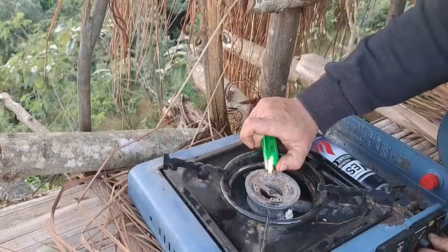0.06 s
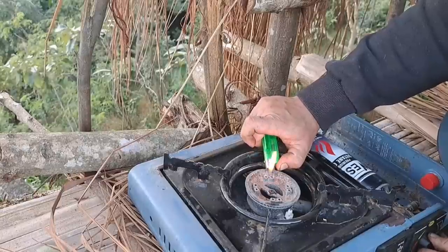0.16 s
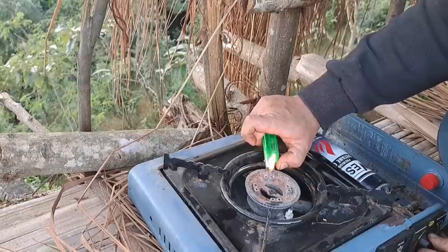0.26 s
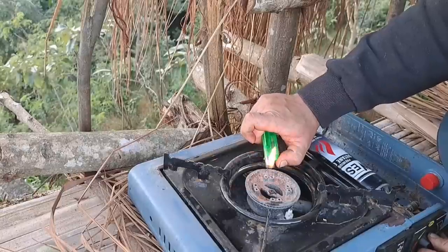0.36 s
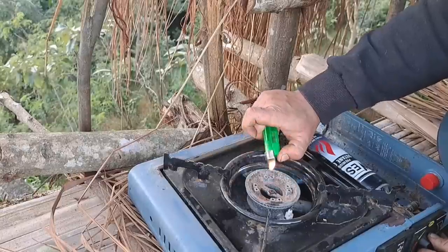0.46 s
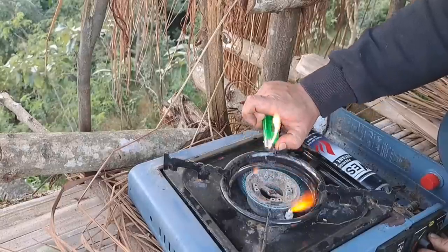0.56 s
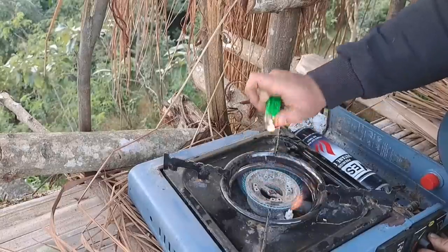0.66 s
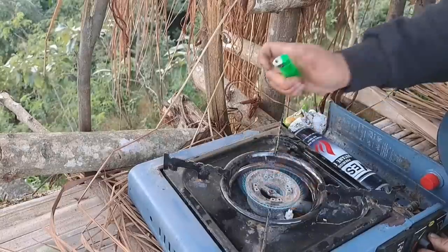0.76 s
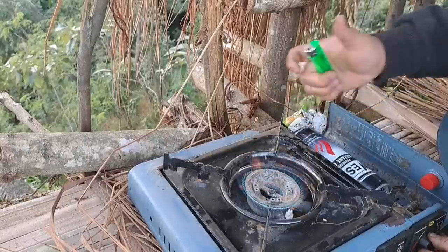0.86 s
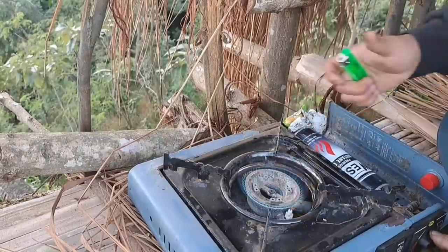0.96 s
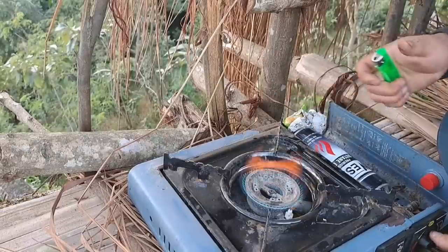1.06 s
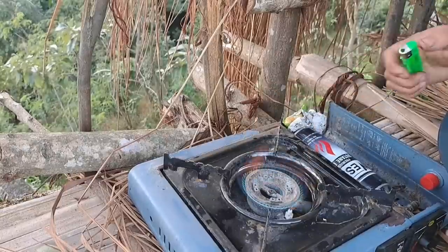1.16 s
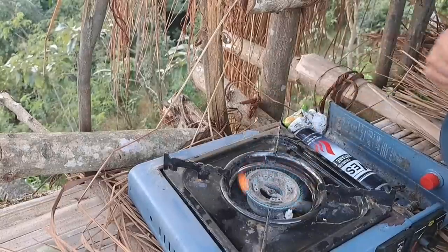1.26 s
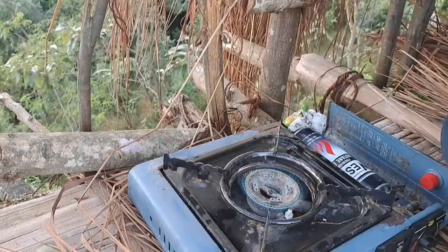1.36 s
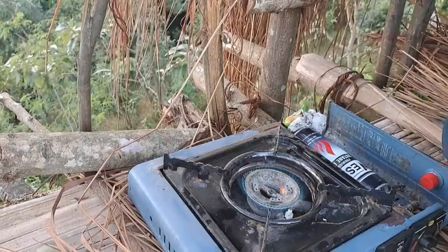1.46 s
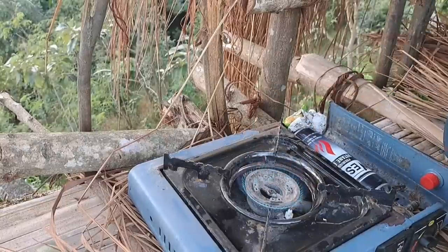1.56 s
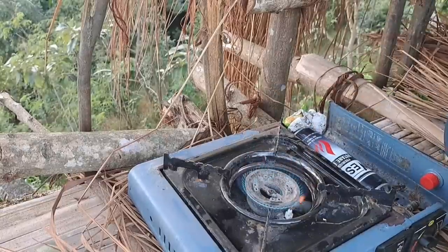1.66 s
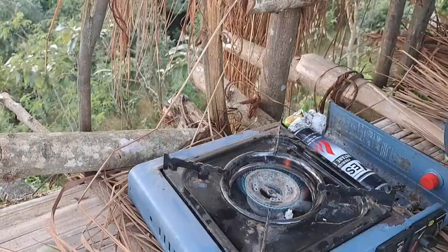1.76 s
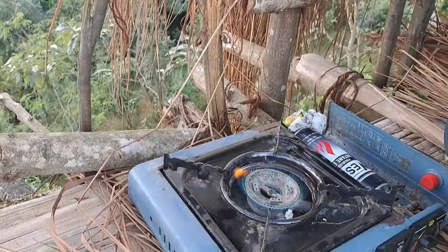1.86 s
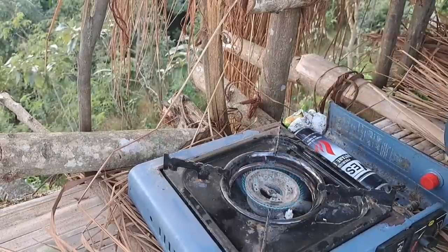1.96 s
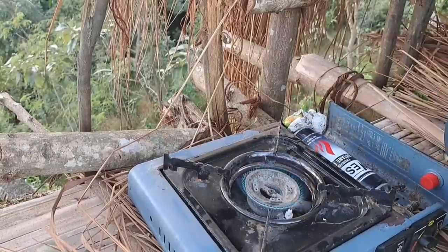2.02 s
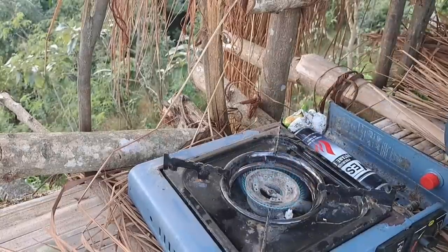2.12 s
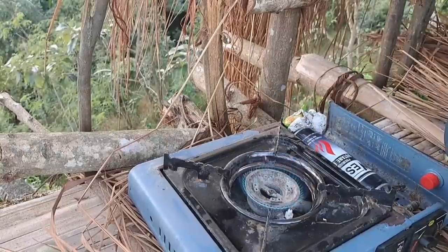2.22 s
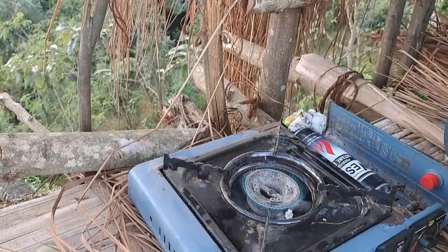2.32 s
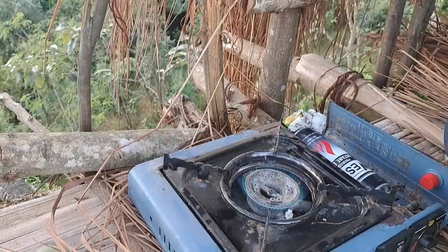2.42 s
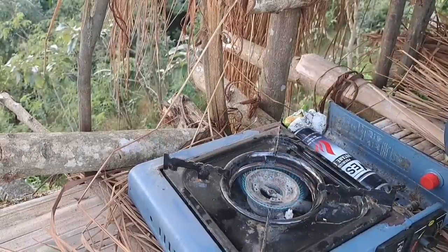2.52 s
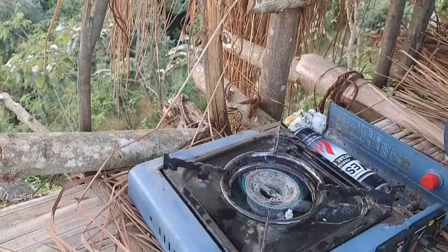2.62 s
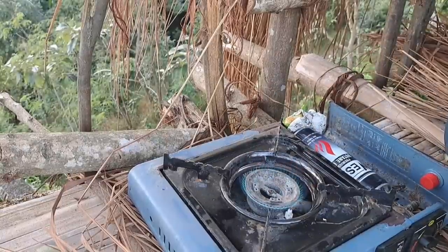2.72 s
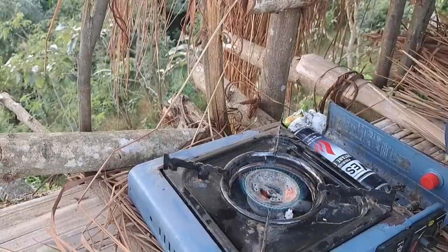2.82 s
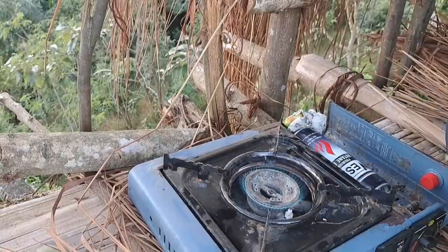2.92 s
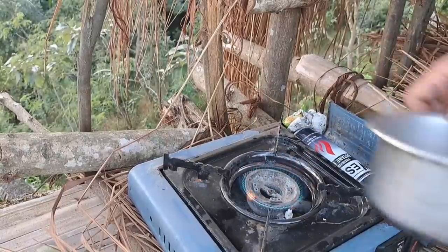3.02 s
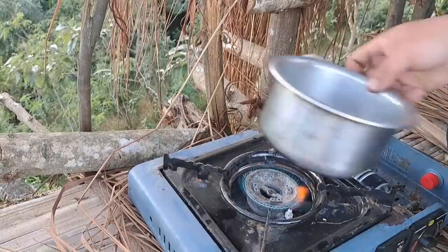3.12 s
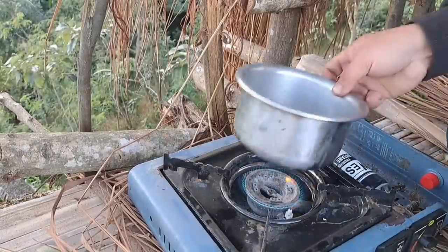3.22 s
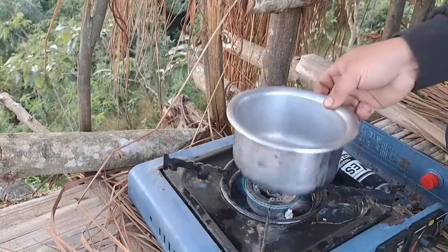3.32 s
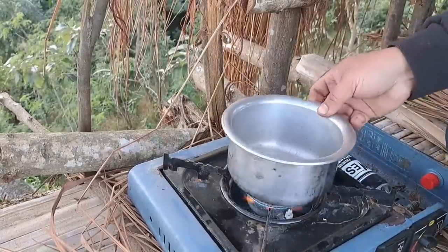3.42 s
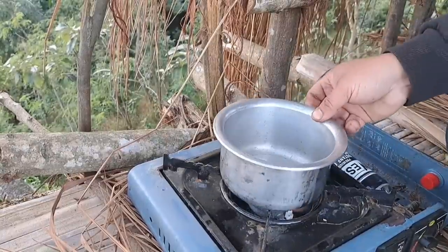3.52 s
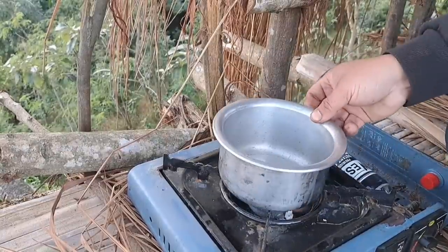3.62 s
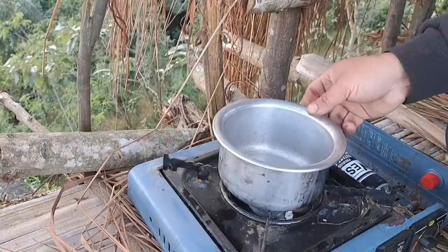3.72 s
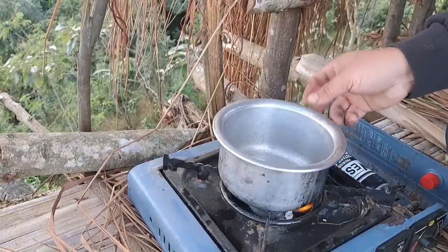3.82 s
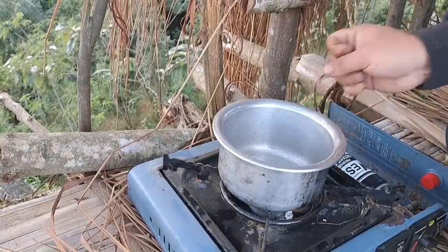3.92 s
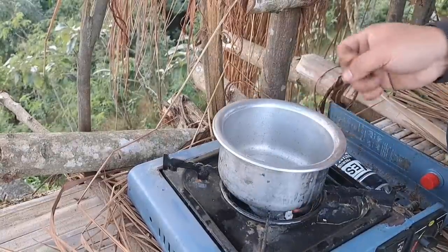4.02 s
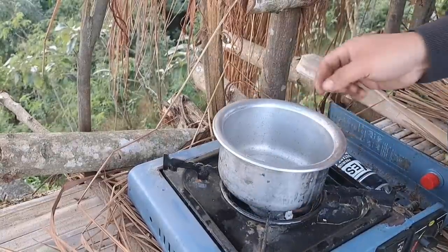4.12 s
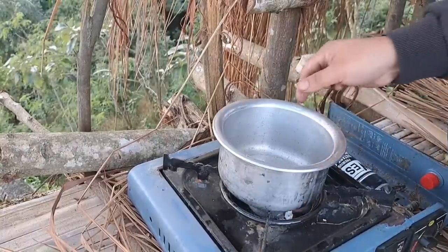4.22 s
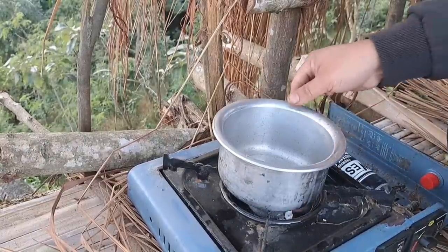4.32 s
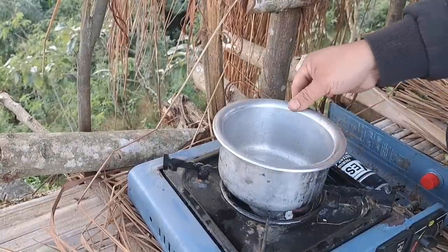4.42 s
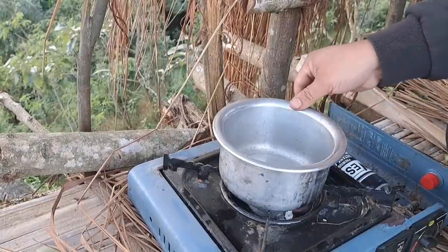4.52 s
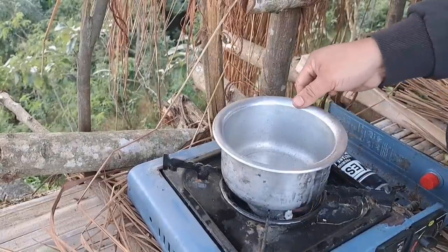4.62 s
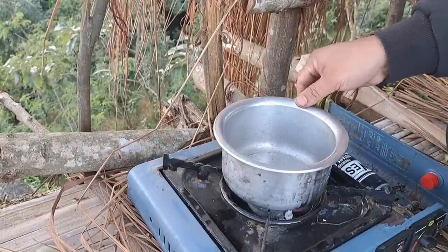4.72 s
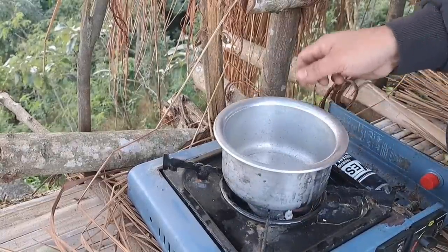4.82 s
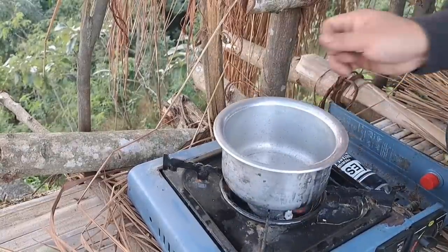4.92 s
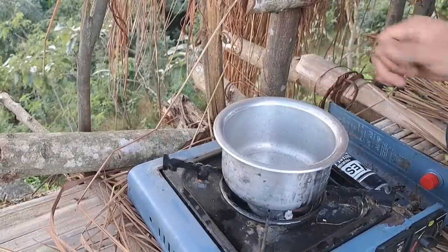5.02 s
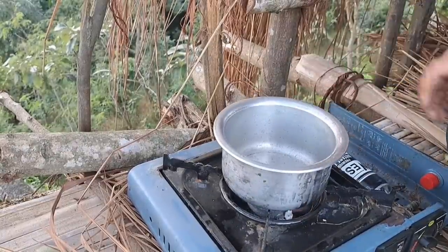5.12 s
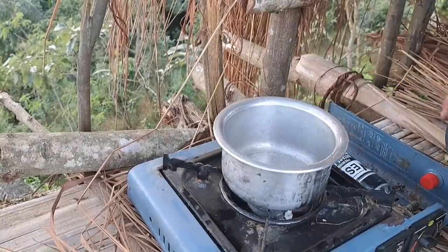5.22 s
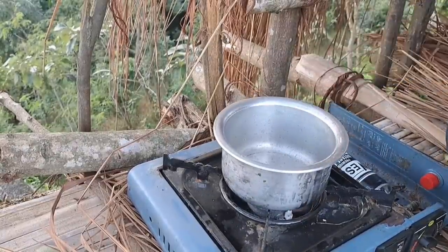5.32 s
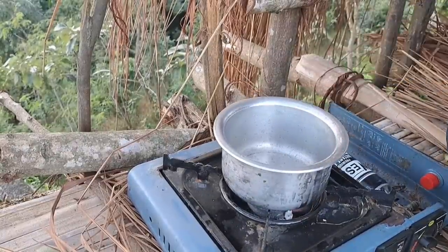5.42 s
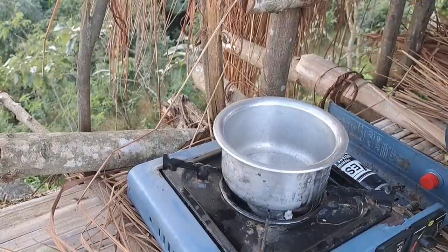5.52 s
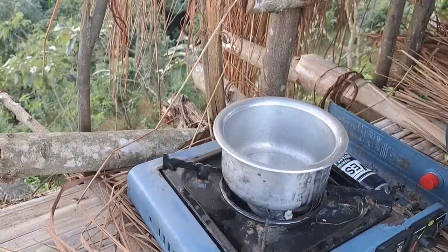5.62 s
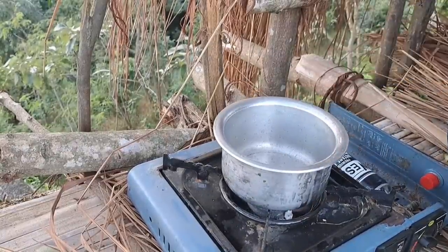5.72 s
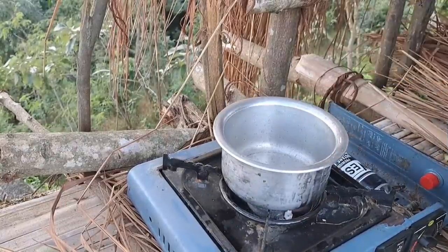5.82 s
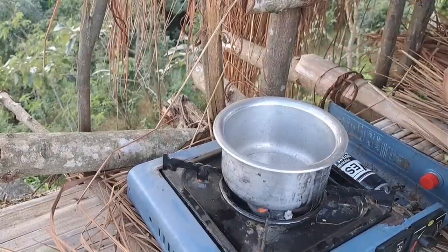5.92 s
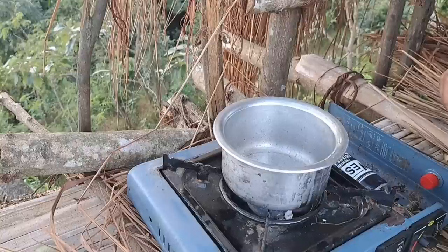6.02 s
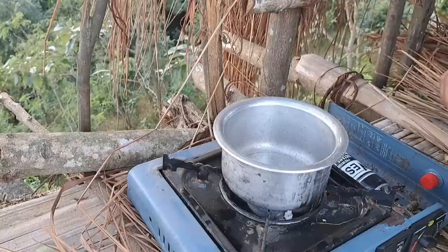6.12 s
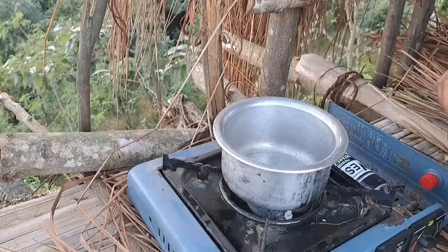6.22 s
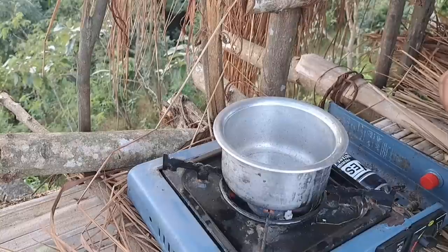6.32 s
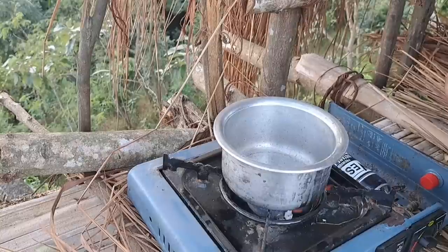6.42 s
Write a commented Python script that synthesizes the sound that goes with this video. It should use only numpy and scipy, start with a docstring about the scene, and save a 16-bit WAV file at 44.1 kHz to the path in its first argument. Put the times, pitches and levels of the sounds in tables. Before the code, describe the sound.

Close, dry stereo in a quiet open shelter with barely audible outdoor air. A fine gas hiss runs throughout, leaning right. At about 0.5 s a lighter hisses and clicks faintly; from 0.6 to 1.0 s the gas catches in soft, deep puffs. The flame drops quieter, then swells around 1.4 s into a low fluttering roar, dipping abruptly near 2.3 s and wavering until 3.4 s, with small ticks and light sleeve rustles. At 3.5-3.75 s an empty aluminium pot lands on the grate: a loud, quick cluster of clanks, rattling casing and short metallic ring, with a brief scrape. The flame then sounds steadier, muffled and hollow. Slight ticks around 4.5 s; at 4.8 s a sharp sideways nudge clanks again. Cloth rustles most clearly around 5.3 s, with lighter strokes after. From 5.9 s the flame sinks gently, with one last soft deep puff near 6.2 s.

```python
"""Gas stove and pot, open shelter

Close by, in stereo: gas hisses from the jet as coloured noise, a lighter hisses and clicks in short noise bursts,
and the flame catches in puffs, then settles to a low rush of fluttering noise. An empty aluminium pot clatters
onto the grate and is nudged into place: ringing modes over noisy clatter and thumps. The flame then sounds hollow
under its base. Sleeves rustle in strokes of filtered noise, and faint outdoor air lies behind."""
import sys
import numpy as np
from scipy import signal
from scipy.fft import rfft, irfft, next_fast_len
from scipy.io import wavfile
from scipy.ndimage import uniform_filter1d

SR = 44100
rng = np.random.default_rng(int(sys.argv[2]) if len(sys.argv) > 2 else 0)


def generate_wav(signal):
    """Clip the signal to [-1, 1] and save it as 16-bit WAV at the path in sys.argv[1]."""
    frames = np.transpose(np.atleast_2d(signal))
    scaled = np.clip(frames, -1, 1) * 32767
    pcm = np.round(scaled).astype(np.int16)
    wavfile.write(sys.argv[1], SR, pcm)


N = 285327
T = np.arange(N) / SR
RING = SR // 3  # samples kept of each struck sound
POT_ON_S = 3.62
TOP_HZ = 15550  # upper limit of the treble

# open flame roaring up and sinking in the draught, before trims: [t/s, level/dB]
OPEN_FLAME_LEVEL = [(1.0, -63), (1.03, -65.5), (1.32, -64), (1.42, -51), (2.03, -51.5), (2.12, -51.5),
                    (2.26, -81), (2.29, -58), (2.51, -65), (2.63, -55), (3.11, -63), (3.2, -54),
                    (3.27, -65), (3.41, -66.5), (3.49, -47)]
# turbulent roar of the open flame: [f/Hz, relative level/dB]
OPEN_ROAR = [(25, -23.5), (55, -9), (90, -12.5), (140, 0), (230, 2), (340, -5), (500, -12), (620, -22),
             (740, -35.5), (1000, -31), (1600, -43), (4000, -47.5)]
# roar of the flame spread under the pot base: [f/Hz, relative level/dB]
COVERED_ROAR = [(25, -22), (70, -14), (110, -5.5), (165, 0), (250, 0), (350, -6), (520, -7), (670, -15),
                (770, -34), (1350, -25.5), (2300, -37.5), (3150, -28.5), (3900, -37.5), (9000, -42.5)]
# the gas catching in puffs: [t/s, length/s, level/dB, deep boom against the roar/dB]
IGNITION_PUFFS = [(0.575, 0.143, -46.5, -5.5), (0.749, 0.025, -46.5, -1), (0.821, 0.039, -49.5, -2.5),
                  (0.854, 0.11, -51, -23)]
PUFF_ATTACK_S, PUFF_RELEASE_S = 0.01, 0.011
# under the pot the flame holds its level, then calms down
COVERED_DB, CALM_S, CALM_DB_PER_S = -53, 5.91, 22
# pockets of gas flaring up: [peak t/s, level/dB, time from peak to 1/e of it/s]
GAS_FLARES = [(2.107, -55.5, 0.086), (2.309, -57.5, 0.026), (3.1, -67, 0.061), (6.24, -62, 0.19)]
# gas jet and mixing tube: [f/Hz, width before broadening/Hz, relative level/dB]
JET_RESONANCES = [(1530, 120, -2), (1890, 76, -2), (2750, 240, -12), (4775, 140, -3), (5316, 150, 0.5),
                  (5620, 350, -6.5), (6670, 400, -8.5), (7350, 270, 1), (8350, 230, -11),
                  (13200, 2500, -6.5), (15000, 700, -16.5)]
# pot meeting the grate, level of the first contact before trims:
# [t/s, level/dB, contact cut-off f/Hz, bass thump/dB, sideways share 0-1, chatter gap/s]
POT_BLOWS = [(3.5125, -26.5, 1820, -12, 0.46, 0.0048), (3.529, -27.5, 2040, -7, 0.37, 0.0048),
             (3.6115, -32, 1000, -11, 0.02, .008), (3.6349, -22, 3305, -19, 0.4, .0047),
             (3.675, -19.5, 3140, -14, 0.23, 0.0036), (3.7035, -25.5, 2200, -4.5, 0, .0062),
             (3.718, -32, 2540, -10, 0.06, .004), (4.775, -47.5, 1300, 0, 0.54, .005),
             (4.811, -21.5, 4000, -25, 0.9, 0.005), (4.8326, -30, 4030, -14.5, 0.67, 0.007),
             (4.883, -34.5, 1500, -10, 0.1, .003)]
# after each blow the pot chatters over the next prongs; the loss grows with the square of the contact's number
CHATTER_LOSS_DB = 2.5
# the pot's ringing, t60 before the grate damps it, levels before scatter:
# [f/Hz, level struck from below/dB, level pushed sideways/dB, t60/s]
POT_MODES = [(380.5, -11.5, -30.5, 0.44), (666, -16, -14.5, 0.16), (795, 0.5, -5.5, 0.065),
             (823, -4.5, -15, 0.085), (1110, 0, -10, 0.11), (1203, 1.5, -1.5, 0.053), (1439, -1.5, 4, 0.11),
             (1464, -2.5, -9, 0.12), (1560, -3.5, -15, 0.1), (1590, 0, -2, 0.14), (1645, -1, -8.5, 0.068),
             (1840, 2.5, -10.5, 0.14), (1800, -9, -11.5, 0.065), (1873, -10.5, 4.5, 0.08),
             (2003, 8.5, -8.5, 0.072), (2070, 0.5, -0.5, 0.13), (2310, -15, -5.5, 0.13),
             (2440, -5.5, -10.5, 0.097), (2686, -8, -5, 0.14), (2807, -18.5, -5.5, .14),
             (3040, -6.5, -9.5, 0.099), (3370, 0, -16, 0.14), (3534, -11, 2.5, 0.15),
             (3690, -12, -14, 0.078), (4150, -5, -12.5, .13), (5300, -9, -11, 0.2), (7720, -21.5, -19, 0.1)]
# dense, quickly damped clatter of grate and stove casing: [f/Hz, relative level/dB]
CASING_CLATTER = [(150, -35), (400, -7.5), (700, -4.5), (1000, 0), (1450, 4.5), (2050, -3), (2600, -4),
                  (3400, -8.5), (4600, -15.5), (7500, -14.5), (9300, -24), (12000, -13), (15500, -22.5)]
# hollow stove body on its boards: [f/Hz, relative level/dB]
BODY_THUMP = [(25, -38), (65, -23.5), (130, 0), (250, 0.5), (480, 0.5), (700, 4), (1500, -17.5)]
# pot base sliding on the grate: [t/s, length/s, peak level/dB]
POT_SLIDES = [(3.57, 0.075, -42.5), (4.755, 0.061, -50)]
# lighter clicks, flame pops, handling ticks and light knocks, width before broadening:
# [t/s, level/dB, centre f/Hz, width/Hz, t60/s]
SMALL_TICKS = [(0.5185, -55.5, 1190, 810, 0.24), (0.6693, -57, 1400, 1800, 0.012),
               (0.713, -52, 804, 395, 0.011), (0.8719, -45.5, 4940, 7050, 0.052),
               (1.4524, -41.5, 7400, 8000, 0.0097), (2.06, -45, 450, 260, 0.021),
               (2.123, -45, 470, 330, 0.014), (2.303, -48.5, 6900, 4500, 0.11),
               (2.3833, -58.5, 4000, 4460, 0.32), (3.036, -50.5, 3260, 9200, 0.058),
               (3.1958, -54, 1990, 1960, 0.024), (3.8062, -44, 900, 390, 0.072),
               (4.5218, -51, 4630, 6930, 0.013), (4.532, -52, 930, 347, 0.066),
               (4.672, -53.5, 1090, 650, 0.24), (5.678, -55.5, 1165, 1096, 0.023),
               (5.8076, -51.5, 4980, 12300, 0.032), (6.1768, -64.5, 1012, 1180, 0.26)]
# strokes of the sleeve; the first row is the hiss of the lighter's gas: [t/s, length/s, peak level/dB]
SLEEVE_STROKES = [(0.51, 0.23, -68.5), (1.12, 0.23, -69), (1.58, 0.47, -66.5), (1.95, 0.45, -64),
                  (2.09, 0.13, -60.5), (2.29, 0.22, -59.5), (2.53, 0.18, -68.5), (2.77, 0.15, -59),
                  (2.92, 0.46, -67.5), (4.0, 0.51, -73), (4.74, 0.2, -59), (5.16, 0.12, -66),
                  (5.23, 0.37, -56.5), (5.55, 0.27, -62.5), (5.81, 0.32, -61.5)]
STROKE_PEAK = 0.14  # share of each stroke, hiss or pot slide spent rising
# rubbing cloth: [f/Hz, relative level/dB]
CLOTH_RUB = [(500, -19), (1400, 3), (2400, 1.5), (3800, -1.5), (5200, 3.5), (7600, 3.5), (9300, -3.5),
             (12500, 7), (15500, -1)]
# the weave singing, pitch at the height of a stroke: [t/s, length/s, f/Hz, level/dB]
WEAVE_TONES = [(2.096, 0.064, 2100, -66), (2.173, 0.1, 2060, -66.5), (2.301, 0.076, 2050, -63),
               (2.343, 0.064, 1323, -62), (2.705, 0.093, 880, -66.5), (5.275, 0.021, 4700, -61),
               (5.513, 0.27, 4430, -68)]
# still outdoor air: [f/Hz, relative level/dB]
OUTDOOR_AIR = [(20, -5), (50, -1), (100, -1), (180, -8), (400, -15), (800, -19), (3000, -23), (15000, -25)]
# side against middle at the two microphones: [f/Hz, level/dB]
STEREO_SPREAD = [(30, -11), (120, -15.5), (300, -15.5), (700, -7), (1500, -2.5), (2500, -3), (4500, 1),
                 (9000, 0)]
# the right microphone's extra gain over the left: [f/Hz, gain/dB]
RIGHT_MICROPHONE = [(2300, 0.5), (3400, 1), (4800, 2), (6500, 1.5), (12000, -3)]


def flame(flutter_db=1.85, covered_flutter_db=0.86, tear_db=6.5, tear_level_db=-19.0, puff_tear_db=-5,
          covered_tear_db=-8, open_db=-0.8, covered_db=-1.0, sway_db=0.74, lick_db=4):
    """Turbulent burning roars low, tearing flamelets sputter above; the pot steadies it and makes it hollow."""
    covered = np.clip((T - POT_ON_S) / 0.37 + 0.5, 0, 1)
    calming = CALM_DB_PER_S * np.maximum(T - CALM_S, 0)
    under_pot = COVERED_DB - calming + sway_db * walk(13)
    lit = np.clip((T - IGNITION_PUFFS[0][0]) / PUFF_ATTACK_S, 0, 1)
    burning = lit * undb((1 - covered) * curve(OPEN_FLAME_LEVEL) + covered * under_pot)
    puff_power = sum((undb(db) * puff(s, length)) ** 2 for s, length, db, _ in IGNITION_PUFFS)
    strength = np.sqrt(burning ** 2 + puff_power)

    flutter = walk(60)
    free = unit(colour(noise(N), shape(OPEN_ROAR))) * undb(open_db + flutter_db * flutter)
    hollow = unit(colour(noise(N), shape(COVERED_ROAR)))
    hollow = hollow * undb(covered_db + covered_flutter_db * flutter)
    # tongues of flame lick the base in short bursts, heard above about 900 Hz
    licks = colour(hollow, lambda f: 1 / (1 + (900 / (f + 1)) ** 8))
    hollow = hollow + licks * (unit(undb(lick_db * flutter)) - 1)
    rush = np.sqrt(1 - covered) * free + np.sqrt(covered) * hollow

    tearing = undb(tear_db * np.clip((flutter + walk(220)) / np.sqrt(2), -2, 2))
    flamelets = resonances([(830, 450, 1), (1550, 1100, -3)])
    sputter = unit(colour(noise(N), lambda f: flamelets(f) ** 2) * tearing)
    # the first puffs burn softly; the full sputter comes with the settled flame
    sputter = sputter * undb(np.interp(T, [0.75, 0.9], [puff_tear_db, 0]))
    sputter = sputter * undb(tear_level_db + covered_tear_db * covered)
    return pan(strength * (rush + sputter), right_db=0.5)


def flares():
    """A pocket of gas burns off with a soft, deep puff."""
    swell = sum(undb(db) * np.exp(-((T - s) / length) ** 2) for s, db, length in GAS_FLARES)
    booms = sum(undb(db + boom_db) * puff(s, length) for s, length, db, boom_db in IGNITION_PUFFS)
    deep = shape([(20, -11), (50, -1.5), (130, 4.5), (260, -17), (1000, -64)])
    return (swell + booms) * unit(colour(noise(N), deep))


def puff(s, length):
    """A puff catches quickly, burns for its length and dies away."""
    catch = np.clip((T - s) / PUFF_ATTACK_S, 0, 1)
    return catch * np.exp(-np.maximum(T - s - length, 0) / PUFF_RELEASE_S)


def jet(level_db=-70.5, shade_db=-4, cover_db=-1):
    """Gas whistles softly through the mixing tube; the pot shades it, the highest hiss most."""
    covered = np.clip((T - POT_ON_S) / 0.2, 0, 1)

    def tube(f):
        return sum(undb(db) * resonances([(hz, 1.5 * width, 0)])(f) ** 2 for hz, width, db in JET_RESONANCES)

    hiss = unit(colour(noise(N), tube))
    top = colour(hiss, lambda f: 1 / (1 + (13500 / (f + 1)) ** 12))
    hiss = hiss + top * (undb(shade_db) - 1) * covered
    return pan(hiss * undb(level_db + cover_db * covered + 0.5 * walk(9)), right_db=7.0)


def pot(ring_db=-3.0, casing_db=0.35, crack_db=-3.5, casing_t60=0.082, crack_t60=0.0094, thump_t60=0.15,
        bass_cut_hz=90, side_casing_db=-3.5, count=3):
    """Each blow cracks, rattles the casing, thumps the body and rings the pot; softer contacts are duller."""
    out = np.zeros((2, N))
    # every blow meets the same crowd of small sheet-metal resonances
    panels = crowd(spacing_hz=40, depth_db=4.5)
    clatter_fade = undb(casing_db) * fade(casing_t60) + undb(crack_db) * fade(crack_t60)
    for s, db, contact_hz, thump_db, sideways, gap in POT_BLOWS:
        contact = signal.butter(1, contact_hz, fs=SR)
        for k in range(count):
            metal = unit(colour(noise(RING, side_db=-2.5), lambda f: shape(CASING_CLATTER)(f) * panels(f)))
            thump = unit(colour(noise(RING), shape(BODY_THUMP))) * fade(thump_t60)
            # a sideways push rings the pot more than the stove
            blow = undb(side_casing_db * sideways) * metal * clatter_fade
            blow = blow + undb(ring_db) * pot_ring(sideways) + undb(thump_db) * thump
            loudness = undb(db - CHATTER_LOSS_DB * k ** 2)
            add(out, s + k * gap, loudness * signal.lfilter(*contact, blow))
    # a high-pass keeps deep bass out of the abrupt blows
    bass_cut = signal.butter(2, bass_cut_hz, "high", fs=SR, output="sos")
    return pan(signal.sosfilt(bass_cut, out), right_db=2.0)


def pot_ring(sideways, scatter_db=2, apart=0.28, grip_hz=9000):
    """The pot's modes; the direction of the blow sets their mixture, with a little random scatter."""
    hz, below_db, side_db, t60 = np.transpose(POT_MODES)
    chance = rng.standard_normal((len(hz), 4)).T
    size = undb(below_db + (side_db - below_db) * sideways + scatter_db * chance[0])
    # higher modes reach the two microphones further out of step
    offset = apart * np.array([[1], [-1]]) * shape(STEREO_SPREAD)(hz) * chance[2]
    phase = np.pi * (chance[1] > 0) + offset
    struck_hz = hz * (1 + 0.001 * chance[3])
    turn = 2 * np.pi * struck_hz[:, None] * np.arange(RING) / SR
    # rubbing on the grate damps the high modes
    decay = fade((t60 / (1 + (hz / grip_hz) ** 2))[:, None])
    ring = (size * np.cos(phase)) @ (np.sin(turn) * decay)
    ring = ring + (size * np.sin(phase)) @ (np.cos(turn) * decay)
    return ring / np.sqrt(np.sum(size ** 2) / 2)


def slide(grit_db=2.4):
    """Grit under the sliding base rasps through the grate's resonances."""
    grit = noise(N, side_db=-2.5) * undb(grit_db * walk(700))
    grate = resonances([(1100, 620, 4.0), (1545, 300, 0.0), (2030, 270, -5.0), (3310, 1060, -0.5),
                        (5300, 490, -3)])
    rasp = unit(colour(grit, lambda f: grate(f) ** 2))
    return pan(rasp * rubbing(POT_SLIDES), right_db=3.5)


def ticks(tail_db=-23, tail_t60=0.79, ripple_db=4):
    """Small dry clicks, each with its own tiny resonances and a faint scatter from the shelter."""
    out = np.zeros((2, N))
    for s, db, hz, width, t60 in SMALL_TICKS:
        body = resonances([(hz, 1.7 * width, 0)])
        ripple = crowd(200.5, ripple_db)
        burst = unit(colour(noise(RING), lambda f: body(f) ** 2 * ripple(f)))
        add(out, s, undb(db) * burst * (fade(t60) + undb(tail_db) * fade(tail_t60)))
    return pan(out, right_db=2.0)


def sleeves_and_lighter_gas(grain_db=3, catch_db=2.5):
    """Cloth slides in strokes, threads catching in tiny slips; the same noise first serves as lighter gas."""
    rub = unit(colour(noise(N) * undb(grain_db * walk(400)), shape(CLOTH_RUB)))
    return pan(rub * undb(catch_db * walk(22)) * rubbing(SLEEVE_STROKES), right_db=6.5)


def weave(jitter=0.02, arch=0.025, rolloff_db=-0.1, snag_db=3):
    """Threads ticking over threads make a faint, broken zipping tone that follows the stroke."""
    out = np.zeros((2, N))
    cloth = shape([(900, -32), (2800, 5), (6000, 1), (9500, -4), (12500, 6.5)])
    for s, length, hz, db in WEAVE_TONES:
        stroke = np.sin(np.linspace(0, np.pi, int(length * SR)))
        size = len(stroke)
        rate = hz * (1 + arch * (stroke - 1) + jitter * walk(1500)[:size])
        phase = 2 * np.pi * np.cumsum(rate) / SR
        tone = np.zeros((2, size))
        for k in range(1, int(TOP_HZ / hz) + 1):
            start = rng.uniform(0, 2 * np.pi, (2, 1))
            tone += undb(rolloff_db * k) * np.sin(k * phase + start)
        tone = colour(tone, cloth) * undb(snag_db * walk(180)[:size])
        add(out, s, undb(db) * stroke * unit(tone))
    return pan(out, right_db=13.5)


def rubbing(rows):
    """Loudness of (s, length, dB) strokes: each rises quickly, then sinks to rest."""
    power = np.zeros(N)
    for s, length, db in rows:
        progress = np.interp(T, [s, s + STROKE_PEAK * length, s + length], [0, 0.5, 1])
        power += (undb(db) * np.sin(np.pi * progress)) ** 2
    return np.sqrt(power)


def air(level_db=-78.5, swell_db=1.2):
    """Faint outdoor air, its noise wavering gently in level."""
    return unit(colour(noise(N), shape(OUTDOOR_AIR))) * undb(level_db + swell_db * walk(12))


def undb(db):
    """Decibels to gain."""
    return 10 ** (np.asarray(db) / 20)


def unit(x):
    """Scale to rms 1."""
    return x / np.sqrt(np.mean(x ** 2))


def curve(rows):
    """Rows (s, value) joined by straight lines."""
    return np.interp(T, *np.transpose(rows))


def shape(points):
    """Gain against frequency from (Hz, dB) points."""
    hz, db = np.transpose(points)
    return lambda f: undb(np.interp(np.log(f + 1), np.log(hz), db))


def resonances(rows):
    """Gain against frequency of (Hz, width, dB) resonances, summed in power."""
    def gain(f):
        return np.sqrt(sum(undb(db) ** 2 / (1 + ((f * f - hz * hz) / (width * (f + 1))) ** 2)
                           for hz, width, db in rows))
    return gain


def crowd(spacing_hz, depth_db, size=9):
    """Gain against frequency of many small, crowded resonances, even on the whole."""
    grid = np.arange(0, SR / 2, spacing_hz)
    power = undb(depth_db * np.clip(rng.standard_normal(len(grid)), -2, 2)) ** 2
    even = power / uniform_filter1d(power, size)
    return lambda f: np.sqrt(np.interp(f, grid, even))


def colour(x, gain):
    """Filter by a gain against frequency."""
    size = x.shape[-1]
    padded = next_fast_len(size)
    hz = np.arange(padded // 2 + 1) * SR / padded
    return irfft(rfft(x, padded) * gain(hz), padded)[..., :size]


def noise(size, side_db=0):
    """Stereo noise, alike in the bass and unrelated in the treble."""
    mid, side = rng.standard_normal((2, size))
    return mid + undb(side_db) * colour(side, shape(STEREO_SPREAD)) * np.array([[1], [-1]])


def pan(x, right_db):
    """Lean a sound to the right: half the difference is added there and half taken from the left."""
    return x * undb(np.array([[-right_db], [right_db]]) / 2)


def walk(rate):
    """Smooth random wander of rms 1, with about rate new values a second."""
    k = max(int(SR / rate), 2)
    steps = np.repeat(rng.standard_normal(N // k + 1), k)
    return unit(uniform_filter1d(steps, k)[:N])


def fade(t60):
    """Exponential ring-down by 60 dB in t60 seconds."""
    return np.exp(-np.log(1000) * np.arange(RING) / SR / t60)


def add(out, s, x):
    """Mix x into out at time s."""
    i = int(s * SR)
    out[:, i:i + x.shape[1]] += x[:, :N - i]


def scene():
    """Stove, pot and cook in the open air."""
    stove = flame() + flares() + jet()
    cook = sleeves_and_lighter_gas() + weave()
    return stove + cook + pot() + slide() + ticks() + air()


def record(dry):
    """Two microphones differ a little in colour; the top of the treble is cut."""
    ports = shape(RIGHT_MICROPHONE)
    # half the difference goes to each side
    heard = colour(dry, lambda f: ports(f) ** np.array([[-0.5], [0.5]]))
    treble_cut = signal.ellip(10, 0.2, 70, TOP_HZ, fs=SR, output="sos")
    return signal.sosfilt(treble_cut, heard)


dry = scene()
out = record(dry)
generate_wav(out)
```